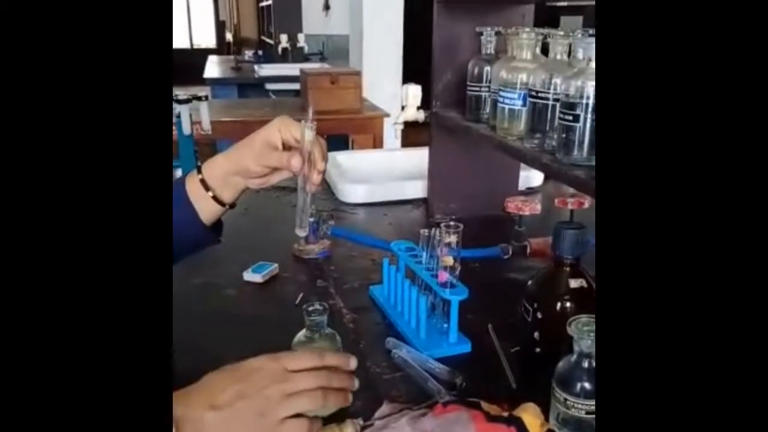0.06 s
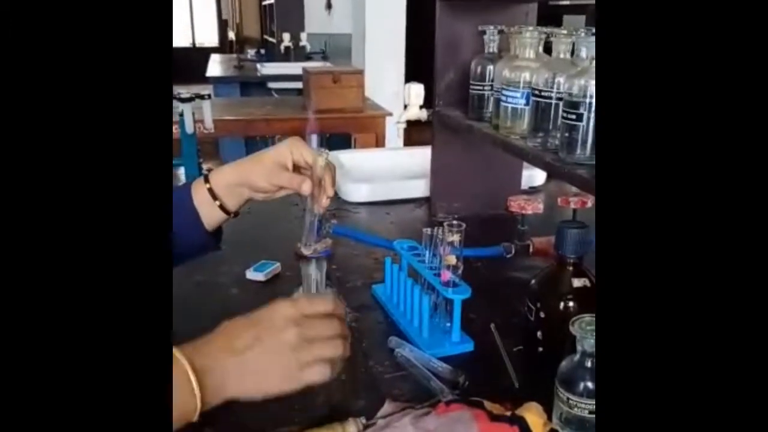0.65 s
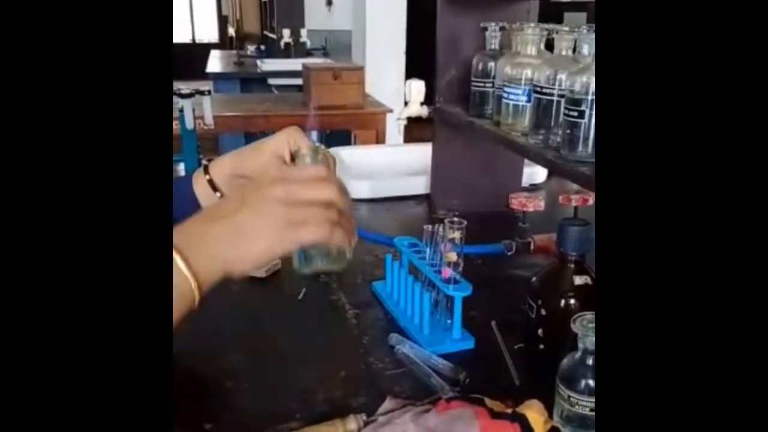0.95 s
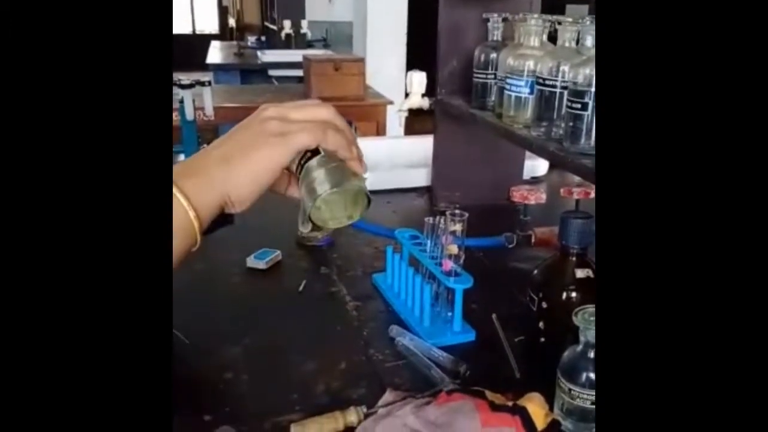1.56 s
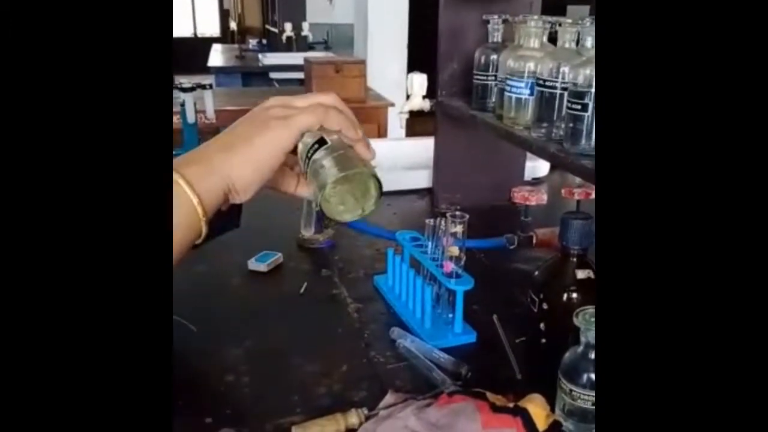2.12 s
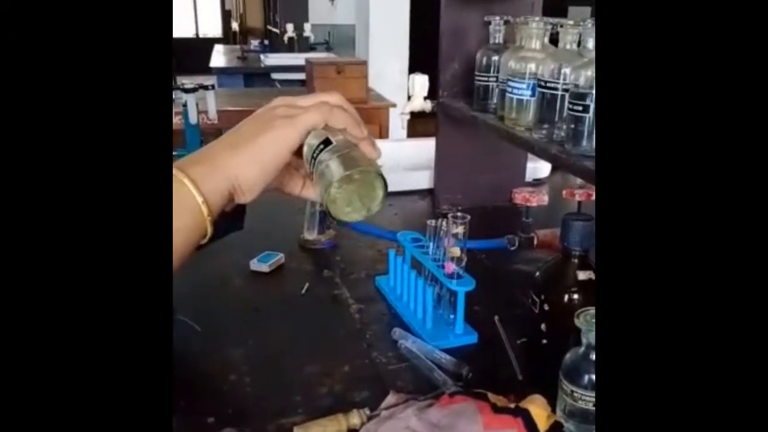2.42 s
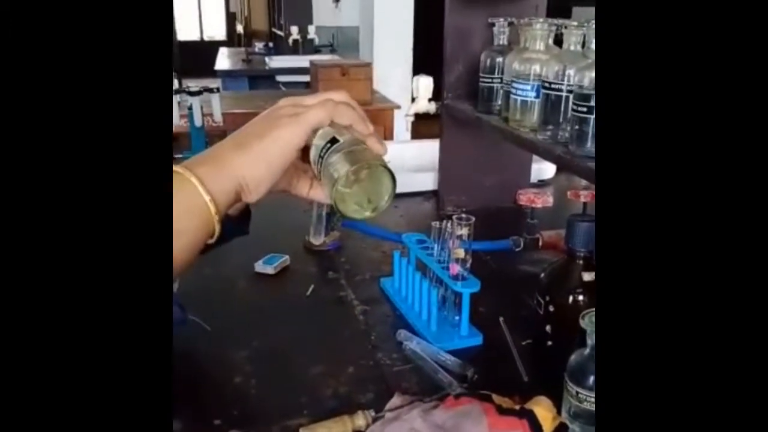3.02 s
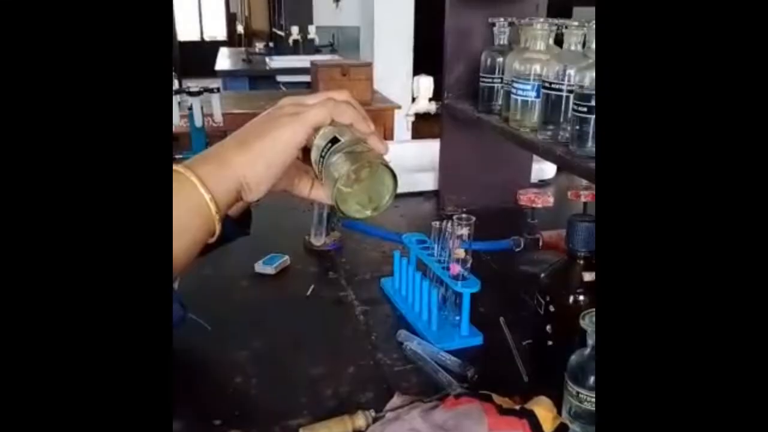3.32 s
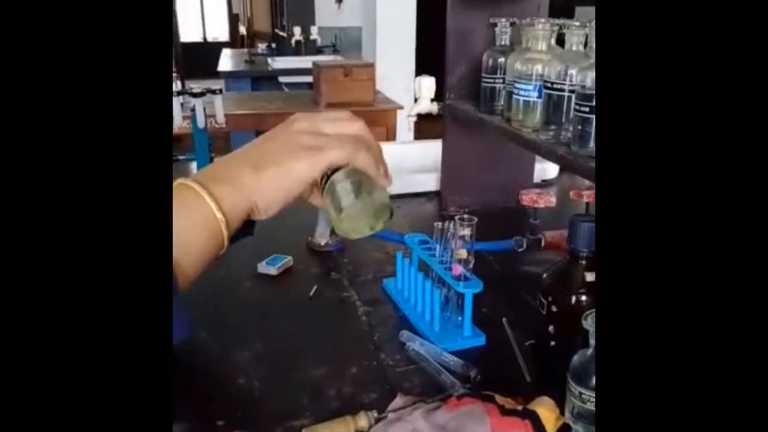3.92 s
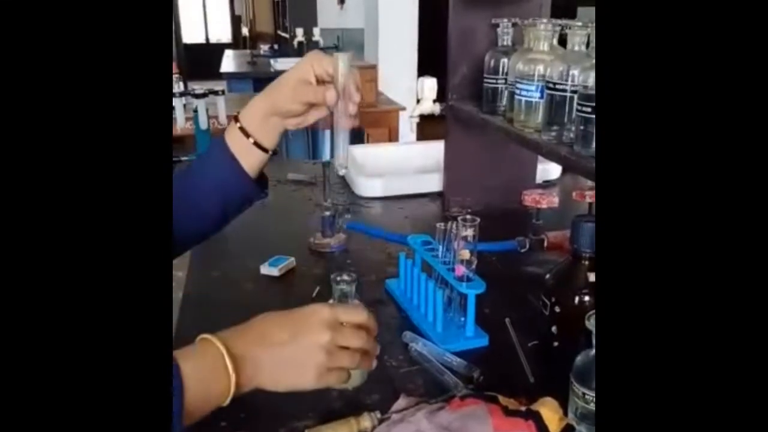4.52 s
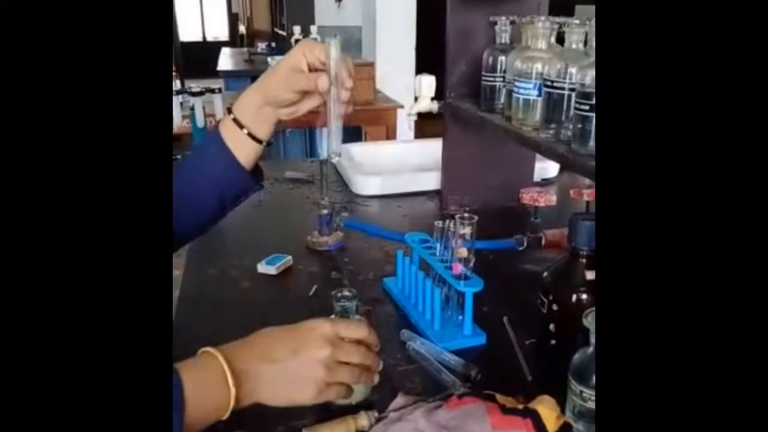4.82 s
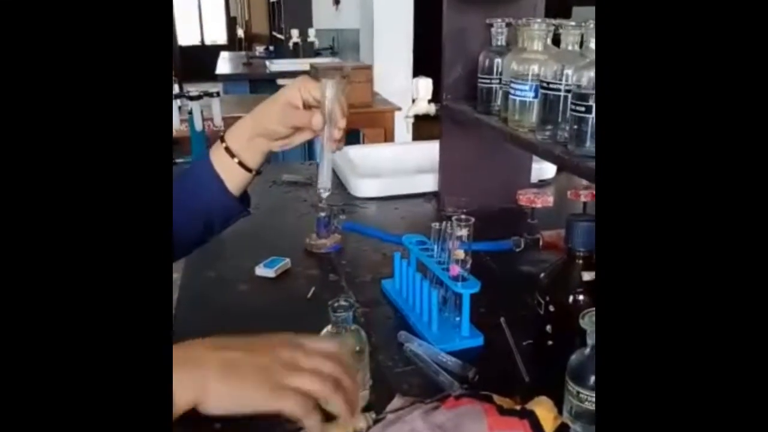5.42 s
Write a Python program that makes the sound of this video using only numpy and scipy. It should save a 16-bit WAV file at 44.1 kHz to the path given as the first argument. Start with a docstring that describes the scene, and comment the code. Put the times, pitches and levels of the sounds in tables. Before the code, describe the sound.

In a reverberant laboratory, with the bench directly in front of the microphone, the tail of a bang fades into faint hum and whine. Two bright clinks ring out as a bottle touches a test tube. A barely audible pour and a short glass ping follow, among light finger ticks and sleeve rustle. The bottle is then set down with a booming wooden knock and a brief rattle, and a soft hiss rises and fades.

```python
"""In a hard-walled laboratory the echo of an earlier bang dies away, leaving a low hum and a thin whine.
Hands and sleeves rustle and glass ticks faintly. A bottle clinks on the lip of a test tube (1.7 s, 2.3 s)
and both ring. A short pour (3.1 s) excites sinking resonances; lifting off, the bottle nudges the filled
tube, which pings lower and shorter. The bottle lands on a wooden bench (5.1 s), which booms as the base
chatters and rocks once. Last, a soft high hiss rises and slowly fades, and the whine swells briefly."""
import sys
import numpy as np
from scipy import signal
from scipy.fft import rfft, irfft, next_fast_len
from scipy.io import wavfile
from scipy.ndimage import uniform_filter1d

SR = 44100
rng = np.random.default_rng(int(sys.argv[2]) if len(sys.argv) > 2 else 0)


def materialize(psi):
    """Save the field psi as 16-bit PCM at rate SR to the path in sys.argv[1].

    A 1-D psi becomes a single channel; in a 2-D psi each row is a channel.
    """
    bounded = np.clip(np.atleast_2d(psi).T, -1, 1)
    quanta = np.round(bounded * 32767).astype(np.int16)
    wavfile.write(sys.argv[1], SR, quanta)


N = 249555
TIME = np.arange(N) / SR  # s
HZ = np.fft.rfftfreq(2 * next_fast_len(N // 2 + 1), 1 / SR)


# Modes of empty tube, its air column, bottle neck, bottle wall: (frequency [Hz], level [dB], t60 [s])
TUBE_MODES = [(2118, -16, .16), (3575, -25, .22), (4290, -16, .1), (5278, -13, .55), (5305, 1, .07),
              (5366, -11, .35), (5420, -11, .3), (5485, -6, .13), (5476, -20, .8), (6272, -17, .35),
              (6310, -15, .4), (6350, -19, .8), (8800, -20, .22)]
AIR_COLUMN_MODES = [(698.2, -5, 0.5), (717, -12, 0.38)]
NECK_MODES = [(1930, 0, 0.013), (2217, 0, 0.034), (2450, 0.5, 0.02), (2764, -5, 0.043), (3400, -26, 0.16),
              (3980, -16, 0.041), (4220, -5, 0.035), (4700, -18.5, 0.024), (5510, -0.5, 0.023),
              (5630, 14, 0.024), (6420, 1, 0.024)]
WALL_MODES = [(2345, -4, .3), (2595, -7, .4), (3542, -9, .35), (4226, 1, .45), (4732, -3, .35),
              (5071, -2, .3), (5270, -3, .25), (6433, -4, .35)]
# Contact spectra: (frequency [Hz], level [dB])
CLACK_SPECTRUM = [(300, -48), (1100, -37), (1600, -16), (2050, 10.5), (2700, 2.5), (3200, -10.5), (4200, 5),
                  (4800, 1), (5550, 17.5), (6050, -9), (6600, -16), (8000, -25), (11000, -56)]
TICK_SPECTRUM = [(2000, -43), (7000, -5.5), (9800, -25), (11300, -30), (12500, -14), (13500, 10),
                 (14700, 0.5), (15400, -5), (16200, -23)]
# Bottle on tube: (time [s], tube [dB], neck [dB], wall [dB], clack [dB], tick [dB],
# hardness as tilt [dB/octave], step per rebound [dB])
CLINK_HITS = [(1.6894, -40, -55, -63, -38.5, -37, 3.5, -0.5), (1.6919, -35, -54, -70, -62, -43, -1, -11),
              (1.7272, -44.5, -28.5, -55, -32.5, -46, -2, -27),
              (2.3434, -57, -34.5, -48, -34.5, -29, -1, -2.5),
              (2.3472, -70, -37.5, -83, -33.5, -49, -4.5, -7), (2.3602, -82, -50, -68, -54, -70, 9, -3.5)]

def clinks(air_db=-20, contacts=3, rebound_s=0.0038):
    """The hand-damped bottle neck chatters on the lip; the tube, its air and the bottle wall ring on."""
    rings, blows, air = np.zeros((3, N))
    beating = dict(beat_db=4, beat_rate_hz=14)  # the glass is never held still
    tube = ring(TUBE_MODES, rise_s=0.00092, **beating)
    column = ring(AIR_COLUMN_MODES, rise_s=0.019)
    wall = ring(WALL_MODES, rise_s=0.003, **beating)
    for s, tube_db, neck_db, wall_db, clack_db, tick_db, hardness, rebound_db in CLINK_HITS:
        add(rings, s, amp(tube_db) * tube + amp(wall_db) * wall)
        add(air, s, amp(tube_db + air_db) * column)
        add(blows, s, amp(tick_db) * crack(TICK_SPECTRUM, t60_s=0.008, push=0.21, rise_s=0.0005))
        neck = amp(neck_db) * ring(tilt(NECK_MODES, hardness), rise_s=0.0014, size=4096)
        for k in range(contacts):
            clack = crack(tilt(CLACK_SPECTRUM, hardness), t60_s=0.0058, push=0.41, rise_s=0.00063)
            add(blows, s + k * rebound_s, amp(k * rebound_db) * (neck + amp(clack_db) * clack))
    rings = room(rings, tail_db=-8.5, near_db=-21, near_t60_s=0.28)
    blows = room(blows, tail_db=-10.5, near_db=-11.5, near_t60_s=0.18)
    return rings + blows + air


# Modes of bench top and bottle base: (frequency [Hz], level [dB], t60 [s])
BENCH_MODES = [(164.6, -24.5, 0.53), (239, -15.5, 0.97), (312, 7, 0.04), (306, -4.5, 0.34), (358, -15.5, 1),
               (388, -14, .6), (531, -22.5, 0.52), (673, -18, 0.25), (846, -23.5, 0.42), (1225, -32, 0.35),
               (1263, -31.5, 0.77)]
BASE_MODES = [(705, -15, 0.099), (857, 8, 0.0075), (1130, 0.5, 0.0064), (1610, -19, 0.03)]
# Contact spectra: (frequency [Hz], level [dB])
KNOCK_SPECTRUM = [(30, -43.5), (90, -27.5), (190, 4.5), (550, 4), (850, 17.5), (1300, -14), (1900, -17.5),
                  (2750, -6.5), (3200, -41), (4400, -39), (6000, -79), (9000, -75.5), (14000, -60)]
RATTLE_SPECTRUM = [(300, -39), (1300, 10.5), (2000, 11), (2850, 7.5), (3300, -5.5), (4400, -12.5),
                   (5500, -23.5), (7000, -41), (10000, -52), (14000, -33)]
# Rim lands, chatters flat, rocks once: (time [s], knock [dB], base [dB], boom [dB], rattle [dB])
LANDING_HITS = [(5.0715, -17.5, -9, -19.5, -28.5), (5.0745, -36.5, -40, -15, -31),
                (5.078, -27, -42.5, -15.5, -33), (5.0844, -28, -22.5, -24, -46),
                (5.248, -24, -27, -21, -45), (5.2523, -26, -33, -22.5, -45)]

def set_down(low_cut_hz=105):
    """The heavy base knocks on wood with a short hollow ring; the glass rattles, the bench booms."""
    knocks, booms, glass = np.zeros((3, N))
    bench = ring(BENCH_MODES, rise_s=0.00027)
    base = ring(BASE_MODES, rise_s=0.00047)
    for s, knock_db, base_db, boom_db, rattle_db in LANDING_HITS:
        add(knocks, s, amp(base_db) * base)
        add(knocks, s, amp(knock_db) * crack(KNOCK_SPECTRUM, t60_s=0.012, push=0.29, rise_s=0.0015))
        add(booms, s, amp(boom_db) * bench)
        add(glass, s, amp(rattle_db) * crack(RATTLE_SPECTRUM, t60_s=0.026, push=0.84, rise_s=0.00083))
    sound = room(knocks, tail_db=5, near_db=-9.5, near_t60_s=0.45)
    sound += room(booms, tail_db=-11, near_db=-30.5, near_t60_s=0.092)
    sound += room(glass, tail_db=-12, near_db=-7.5, near_t60_s=0.25)
    # the landing carries little deep bass
    return signal.sosfilt(signal.butter(3, low_cut_hz, "highpass", fs=SR, output="sos"), sound)


# Modes of the filled tube: (frequency [Hz], level [dB], t60 [s])
FILLED_TUBE_MODES = [(2273, -1.5, 0.034), (2323, -29, 0.1), (2360, -17.5, .08), (2770, -21.5, .07),
                     (4130, -18.5, 0.069), (4545, -23.5, 0.067), (5650, -10, 0.034), (5980, -17, 0.04),
                     (6770, -26, 0.05)]
# Contact spectrum: (frequency [Hz], level [dB])
NUDGE_SPECTRUM = [(2000, -38), (7700, -7), (9500, -38), (11500, -27), (13200, 0), (14800, 9), (15500, 0),
                  (16200, -22)]
# Bottle mouth on tube: (time [s], ping [dB], tick [dB])
NUDGE_HITS = [(3.7362, -46, -69), (3.8319, -35, -42), (3.979, -51.5, -75), (4.365, -62, -57)]

def nudges():
    """The bottle nudges the tube as it lifts off; the liquid makes the ping lower and shorter."""
    out = np.zeros(N)
    ping = ring(FILLED_TUBE_MODES, rise_s=0.00146)
    for s, ping_db, tick_db in NUDGE_HITS:
        add(out, s, amp(ping_db) * ping)
        add(out, s, amp(tick_db) * crack(NUDGE_SPECTRUM, t60_s=0.0095, push=0.25, rise_s=0.0006))
    return room(out, tail_db=-8, near_db=-7, near_t60_s=0.17)


def pour(start_s=3.06, drops_per_s=220, dry_db=-84):
    """Fine drops ring two broad resonances that sink as liquid runs in; the flow swells and dries up."""
    rise_s, slacken_s, fade_db_per_s = 0.089, 0.25, 61
    start_hz, sink_hz_per_s, width_hz, upper_ratio = 3690, 800, 240, 1.245
    t = np.clip(TIME - start_s, 0, 1)
    hz = start_hz - sink_hz_per_s * t
    flow = np.minimum(t / rise_s, 1) * amp(-fade_db_per_s * np.maximum(t - slacken_s, 0))
    drops = rng.standard_normal(N) * (rng.random(N) < drops_per_s / SR)
    trickle = unit(resonate(drops, hz, width_hz) + resonate(drops, hz * upper_ratio, width_hz))
    return room(amp(dry_db) * flow * trickle, tail_db=10.5, near_db=8, near_t60_s=0.1)


# Fingertip spectra: (frequency [Hz], level [dB])
TAP_SPECTRUM = [(2000, -35.5), (7000, -19.5), (9500, -19), (11000, -13.5), (12500, 4.5), (13800, 10.5),
                (15200, 4.5), (16000, -7.5)]
SCRATCH_SPECTRUM = [(1000, -33), (3500, -50), (5000, -14.5), (5900, 8), (6900, -4.5), (8000, -6.5),
                    (9800, -26), (12000, -14.5), (16000, -33)]
# Light contacts: (time [s], tap [dB], scratch [dB])
TOUCH_HITS = [(0.504, -68, -61), (0.514, -66, -70), (0.521, -71, -72), (0.93, -46, -51), (1.392, -86, -64),
              (2.678, -51.5, -88), (2.689, -78, -98), (4.579, -37.5, -87), (4.595, -56, -87),
              (4.858, -55.5, -78), (4.874, -60, -95), (5.288, -55, -68), (5.3168, -46.5, -47),
              (5.332, -56, -60)]

def touches():
    """Fingers meet glass too lightly to set it ringing."""
    out = np.zeros(N)
    for s, tap_db, scratch_db in TOUCH_HITS:
        add(out, s, amp(tap_db) * crack(TAP_SPECTRUM, t60_s=0.0089, push=0.3, rise_s=0.0013))
        add(out, s, amp(scratch_db) * crack(SCRATCH_SPECTRUM, t60_s=0.0053, push=0.2, rise_s=0.0011))
    return room(out, tail_db=-5, near_db=-6.5, near_t60_s=0.11)


# Wash spectrum: (frequency [Hz], level [dB])
ECHO_SPECTRUM = [(88, -31), (150, -24), (250, -16.5), (343, -23), (440, -11.5), (551, -0.5), (704, 1.5),
                 (860, -2.5), (970, -2), (1150, 0.5), (1420, -1.5), (2330, 0.5), (2800, -4.5), (3300, -11),
                 (3870, -4), (6010, -21.5), (10000, -80), (13000, -109)]
# Initial wash decay: (frequency [Hz], t60 [s])
ECHO_DECAY = [(200, 1.7), (500, 0.94), (1200, 1.61), (2700, 1.78), (4000, 1.37), (5500, 0.88), (8000, 0.7)]
# Resonances in the echo: (frequency [Hz], level [dB], initial t60 [s])
ECHO_RESONANCES = [(695, -8, 1), (1104, -4.5, 1.7), (1192, -3, 1), (1324, -4, 1), (1583, -6, .8),
                   (1674, -5, 1.6), (1723, -2, .7), (1787, -8, 1.5), (2143, -8, 1.7), (2263, -3, 1),
                   (2360, -5, 1.5), (2480, -7, 1), (2622, -6, 1.2), (2719, -4, 1.4), (2832, -9, 1.2),
                   (3036, -14, 1.2), (3752, -10, 1), (3784, -9, 1.2), (3881, -10, 1), (4285, -13, 1.1)]

def echo(wash_db=-32.5, ring_db=-45, beat_db=6, beat_rate_hz=8, knee_s=0.54, extra_db_per_s=48):
    """A bang's remains: a wash that loses its treble first and beating modes; the end fades faster."""
    wash = unit(mottle(hiss(ECHO_SPECTRUM), depth_db=1.5))
    sound = amp(wash_db) * die_away(wash, ECHO_DECAY)
    beats = narrow_noise(0, beat_rate_hz)
    for hz, db, t60_s in ECHO_RESONANCES:
        beat = np.roll(beats, rng.integers(N))
        envelope = amp(ring_db + db - 60 * TIME / t60_s + beat_db * beat)
        sound += envelope * np.sin(2 * np.pi * (hz * TIME + rng.random()))
    return sound * amp(-extra_db_per_s * np.maximum(TIME - knee_s, 0))


# Soft bumps and blips: (centre time [s], frequency [Hz], level [dB])
BUMP_TONES = [(0.146, 149, -60), (0.338, 286, -60.5), (0.53, 276, -63), (0.587, 316, -58),
              (0.663, 100.7, -58.5), (1.2, 3820, -70), (2.922, 6180, -77), (3.276, 1067, -72.5),
              (3.493, 94.3, -56), (4.956, 93, -59)]

def bumps(length_s=0.088):
    """Brief soft swells of one tone each."""
    out = np.zeros(N)
    t = TIME[:round(length_s * SR)]
    for s, hz, db in BUMP_TONES:
        tone = np.sin(2 * np.pi * (hz * t + rng.random()))
        add(out, s - length_s / 2, amp(db) * np.hanning(len(t)) * tone)
    return out


# High hiss and finer fizz: (frequency [Hz], level [dB])
HISS_SPECTRUM = [(2500, -17.5), (3600, -1), (4300, 10), (5100, -3), (6000, 9), (6900, 3), (7800, -6.5),
                 (10000, -34)]
FIZZ_SPECTRUM = [(8000, -41), (10600, -4.5), (11500, -20), (12200, 3), (15200, 4.5), (15900, -16)]
# Hand strokes (lift, steady, lower, grip, let go), then a soft high hiss after the landing:
# (peak time [s], length [s], hiss [dB], fizz [dB])
NOISE_SWELLS = [(0.907, 0.46, -73, -74.5), (1.152, 1, -74.5, -84), (4.285, 0.7, -76, -76.5),
                (4.602, 0.13, -98, -58.5), (5.312, 0.052, -75.5, -57), (5.447, 1, -66, -71)]

def rustle_and_hiss(idle_hiss_db=-90.5, idle_fizz_db=-96.5, range_db=24, rise_share=0.24, grain_db=2):
    """Skin and cloth slide in uneven grains; after the landing a soft high hiss rises and slowly fades."""
    hiss_gain, fizz_gain = amp(idle_hiss_db), amp(idle_fizz_db)
    for s, length_s, hiss_db, fizz_db in NOISE_SWELLS:
        from_peak = (TIME - s) / length_s
        fade_db = range_db * np.maximum(-from_peak / rise_share, from_peak / (1 - rise_share))
        hiss_gain = np.hypot(hiss_gain, amp(hiss_db - fade_db))
        fizz_gain = np.hypot(fizz_gain, amp(fizz_db - fade_db))
    grain = amp(grain_db * unit(uniform_filter1d(rng.standard_normal(N), size=260)))
    return grain * (hiss_gain * hiss(HISS_SPECTRUM) + fizz_gain * hiss(FIZZ_SPECTRUM))


def whine(centre_hz=2104.3, core_hz=48, skirt_hz=130, level_db=-70):
    """A thin whistle with a fuzzy skirt and faint octave; it wavers in pitch and level and swells once."""
    waver_hz, waver_db, waver_rate_hz = 19, 4, 11
    swell_at_s, swell_width_s, swell_db = 5.56, 0.29, 9.5
    hz = centre_hz + waver_hz * narrow_noise(0, waver_rate_hz)
    out = np.zeros(N)
    for part_hz, width_hz, part_db in [(hz, core_hz, 0), (hz, skirt_hz, -7), (2 * hz, skirt_hz, -20)]:
        tone = unit(resonate(rng.standard_normal(N), part_hz, width_hz))
        waver = np.tanh(narrow_noise(0, waver_rate_hz))
        out += tone * amp(level_db + part_db + waver_db * waver)
    swell = np.exp(-((TIME - swell_at_s) / swell_width_s) ** 2)
    return out * amp(swell_db * swell)


# Room noise: (frequency [Hz], level [dB])
AIR_SPECTRUM = [(25, -13), (60, -8.5), (110, 2.5), (210, 2.5), (330, -6.5), (600, -13), (1700, -14.5),
                (2400, -15), (3200, -24), (4300, -16.5), (5000, -31), (6200, -16), (9500, -42.5),
                (13500, -27)]
# Mains hum and faint high tones: (frequency [Hz], half-width [Hz], level [dB])
HUM_TONES = [(49.3, 2.5, -94), (96.94, 2.2, -76), (200.3, 2.5, -79.5), (5760, 130, -90), (14960, 25, -93)]

def still_air(air_db=-70):
    """Soft room noise with mains hum and the whine."""
    hum = sum(amp(db) * narrow_noise(hz, width_hz) for hz, width_hz, db in HUM_TONES)
    return amp(air_db) * hiss(AIR_SPECTRUM) + hum + whine()


# Reverberation spectrum: (frequency [Hz], level [dB])
TAIL_SPECTRUM = [(100, 6), (300, 3.5), (700, -13), (1500, -8), (2850, -9), (3150, -15), (4400, -1.5),
                 (6000, 3), (9000, 0.5), (14000, -41)]
# Reverberation decay: (frequency [Hz], t60 [s])
TAIL_DECAY = [(100, 0.18), (500, 1.65), (1500, 1.9), (2900, 1.6), (3150, 0.35), (4500, 0.69), (6000, 0.62),
              (9000, 0.27), (14000, .28)]

def room(x, tail_db, near_db, near_t60_s):
    """Adds quick reflections from bench and shelves, and the long tail of the walls."""
    t = TIME[:SR]
    near_noise, tail_noise = rng.standard_normal((2, SR))
    near = unit(near_noise * amp(-60 * t / near_t60_s) * (t > 0.003)) / np.sqrt(SR)
    tail = die_away(tail_noise * (1 - np.exp(-t / 0.01)), TAIL_DECAY)
    hz = np.fft.rfftfreq(SR, 1 / SR)
    energy = curve_at(TAIL_DECAY, hz) * SR / (2 * np.log(1000))
    tail = irfft(rfft(tail) * amp(curve_at(TAIL_SPECTRUM, hz)) / np.sqrt(energy), SR)
    return x + signal.fftconvolve(x, amp(near_db) * near + amp(tail_db) * tail)[:N]


def ring(modes, rise_s, size=SR, beat_db=0, beat_rate_hz=1):
    """Damped sines that swell over the contact time and may beat at random; peak of one."""
    t = TIME[:size]
    tone = np.zeros(size)
    for hz, db, t60_s in modes:
        rates = beat_rate_hz * rng.uniform(0.44, 2.9, (2, 1))
        signs = rng.choice([-1, 1], (2, 1))
        beat = (signs * np.sin(np.pi * rates * t)).sum(0)
        tone += amp(db - 60 * t / t60_s + beat_db * beat) * np.sin(2 * np.pi * hz * t)
    tone *= 1 - np.exp(-(t / rise_s) ** 2)
    return tone / abs(tone).max()


def crack(spectrum, t60_s, push, rise_s, size=4096):
    """An impulsive push and a brief scatter of dense vibration, filtered; constant energy."""
    t = TIME[:size]
    scatter = unit(rng.standard_normal(size) * amp(-60 * t / t60_s) * (1 - np.exp(-t / rise_s)))
    drive = scatter + push * unit(signal.unit_impulse(size))
    log_gain = np.log(amp(curve_at(spectrum, abs(np.fft.fftfreq(size, 1 / SR)))))
    minimum_phase = np.exp(np.conj(signal.hilbert(log_gain)))
    sound = np.fft.ifft(np.fft.fft(drive) * minimum_phase).real
    return unit(sound) * np.sqrt(64 / size)


def resonate(x, hz, width_hz):
    """Two unity-gain resonators in series; hz may glide."""
    carrier = np.exp(2j * np.pi * np.cumsum(hz * np.ones(len(x))) / SR)
    pole = np.exp(-np.pi * width_hz / SR)
    for _ in range(2):
        x = 2 * (carrier * signal.lfilter([1 - pole], [1, -pole], x / carrier)).real
    return x


def die_away(x, decay):
    """Fades each frequency at its own t60."""
    hz, t, bins = signal.stft(x, SR, nperseg=512, noverlap=384)
    fade = amp(-60 * t / curve_at(decay, hz)[:, None])
    return signal.istft(bins * fade, SR, nperseg=512, noverlap=384)[1][:len(x)]


def mottle(x, depth_db):
    """Makes the level uneven in streaks about 130 Hz wide and 0.2 s long."""
    bins = signal.stft(x, SR, nperseg=1024, noverlap=768)[2]
    patches = uniform_filter1d(rng.standard_normal(bins.shape), size=3, axis=0)
    streaks = unit(uniform_filter1d(patches, size=36, axis=1))
    return signal.istft(bins * amp(depth_db * streaks), SR, nperseg=1024, noverlap=768)[1][:len(x)]


def hiss(spectrum):
    """Steady coloured noise; rms of one."""
    return unit(coloured(rng.standard_normal(N), amp(curve_at(spectrum, HZ))))


def narrow_noise(centre_hz, half_width_hz):
    """A wavering tone, or a slow wander if centred on zero; rms of one."""
    band = 1 / (1 + abs((HZ - centre_hz) / half_width_hz) ** 3)
    return unit(coloured(rng.standard_normal(N), band))


def coloured(x, gain):
    """Filters by a gain given at the frequencies HZ."""
    return irfft(rfft(x, 2 * (len(HZ) - 1)) * gain)[:N]


def tilt(spectrum, db_per_octave, pivot_hz=3500):
    """Tips a spectrum or a set of modes about the pivot."""
    return [(hz, db + db_per_octave * np.log2(hz / pivot_hz), *rest) for hz, db, *rest in spectrum]


def curve_at(points, hz):
    """Interpolates on a log-frequency axis."""
    point_hz, values = np.transpose(points)
    return np.interp(np.log(hz + 1), np.log(point_hz + 1), values)


def add(mix, start_s, sound):
    part = mix[max(round(start_s * SR), 0):][:len(sound)]
    part += sound[:len(part)]


def amp(db):
    return 10 ** (np.asarray(db) / 20)


def unit(x):
    """Scales to an rms of one."""
    return x / np.sqrt(np.mean(x ** 2) + 1e-30)


# Stereo width of the room noise: (frequency [Hz], side minus mid [dB])
AIR_WIDTH = [(30, -5.5), (100, -22.5), (200, -23), (400, -14.5), (1300, -11), (2200, -10), (4400, -10),
             (8000, -6.5), (15000, -14.5)]

def scene(spread_db=-31):
    """The bench is straight ahead; room noise and a trace of reflections differ between the ears."""
    centre = clinks() + nudges() + touches() + set_down() + echo() + rustle_and_hiss() + pour() + bumps()
    air_side = coloured(still_air(), amp(curve_at(AIR_WIDTH, HZ)))
    reflections = room(centre, tail_db=-29, near_db=-49.5, near_t60_s=0.1) - centre
    side = air_side + amp(spread_db) * reflections
    mid = centre + still_air()
    return np.array([mid + side, mid - side])


def record(dry):
    """Steep low-pass at 16.1 kHz."""
    lowpass = signal.firwin(511, 16100, window=("kaiser", 9), fs=SR)
    return signal.oaconvolve(dry, lowpass[None], "same")


dry = scene()
out = record(dry)
materialize(out)
```